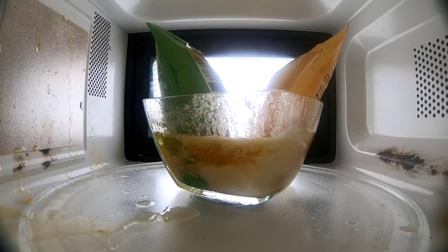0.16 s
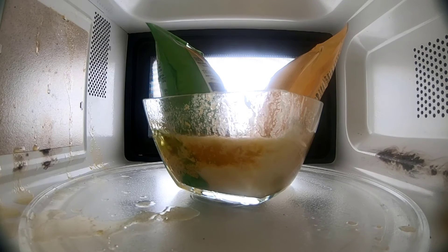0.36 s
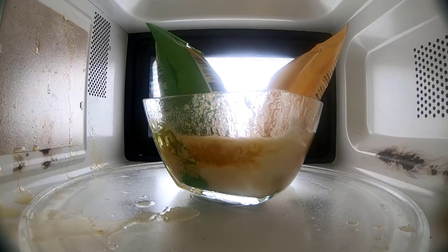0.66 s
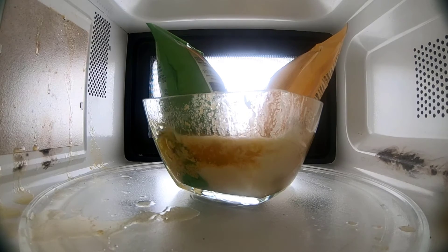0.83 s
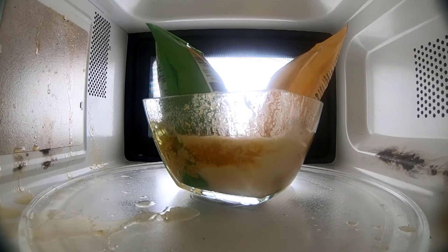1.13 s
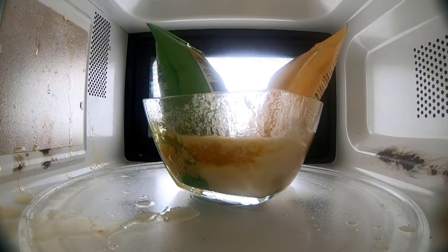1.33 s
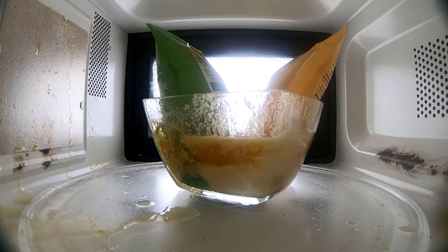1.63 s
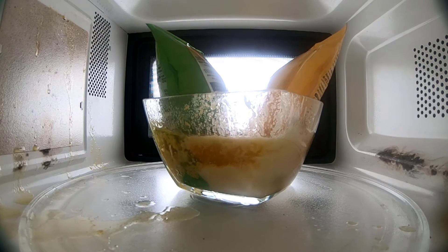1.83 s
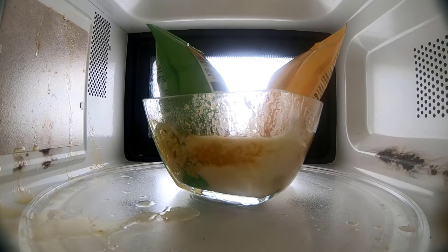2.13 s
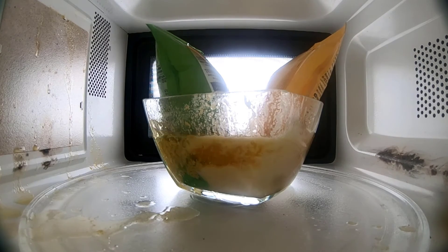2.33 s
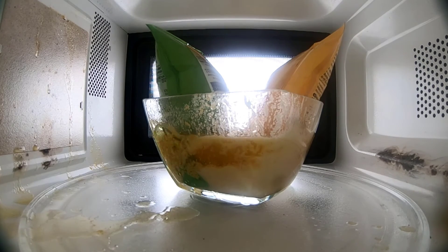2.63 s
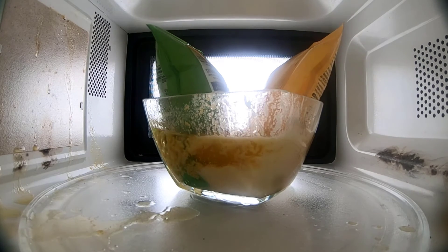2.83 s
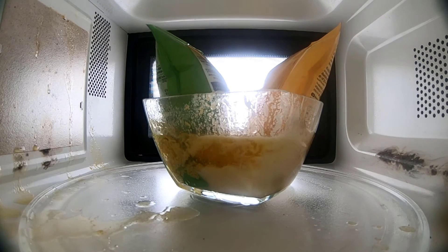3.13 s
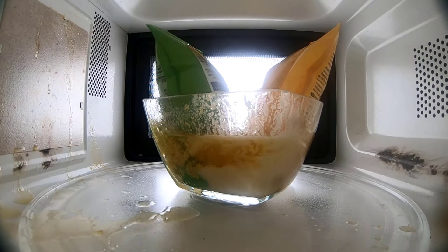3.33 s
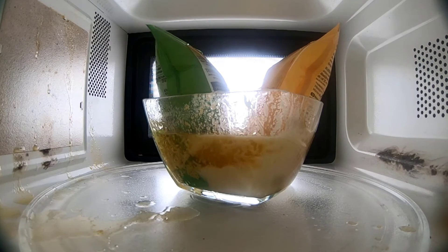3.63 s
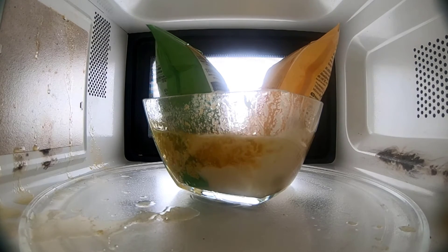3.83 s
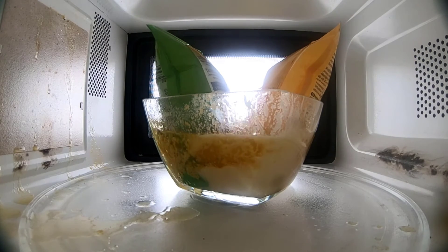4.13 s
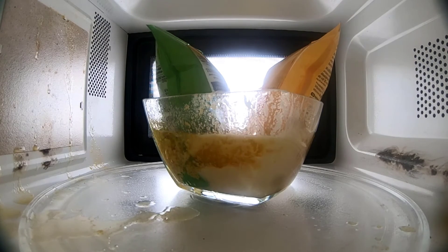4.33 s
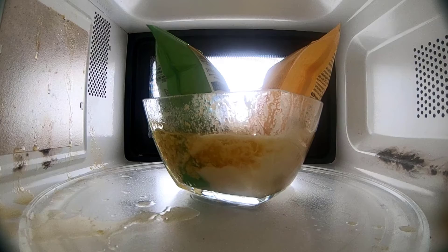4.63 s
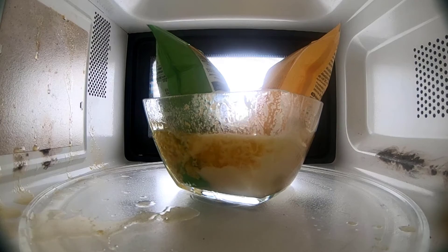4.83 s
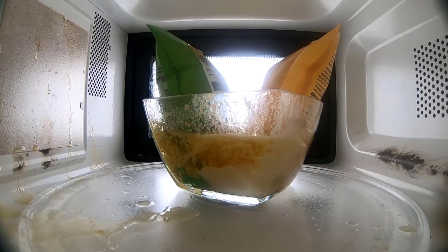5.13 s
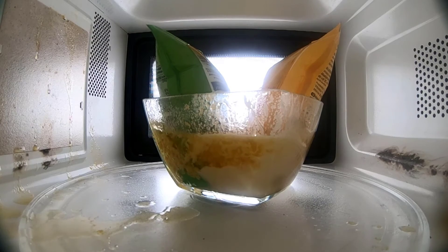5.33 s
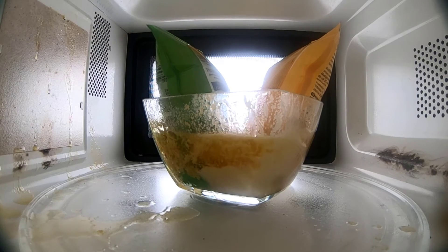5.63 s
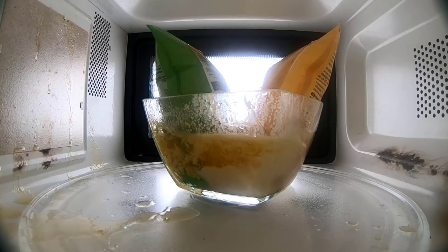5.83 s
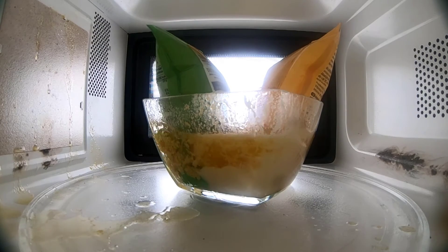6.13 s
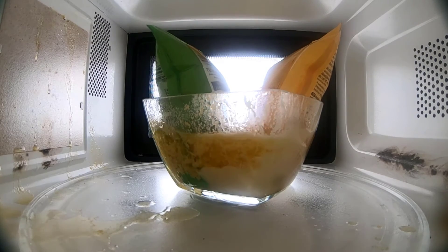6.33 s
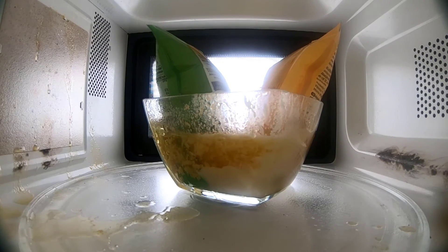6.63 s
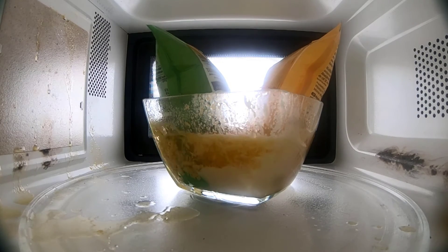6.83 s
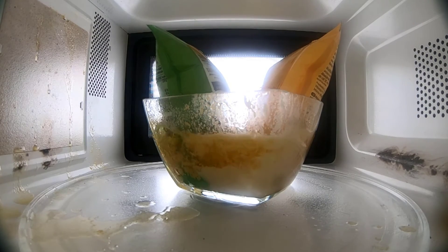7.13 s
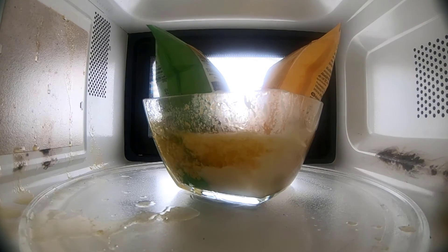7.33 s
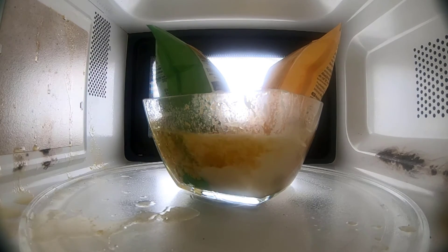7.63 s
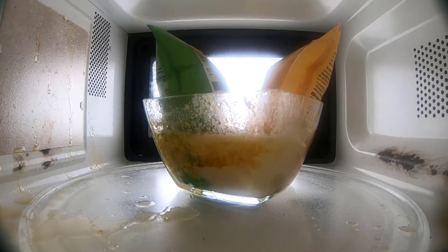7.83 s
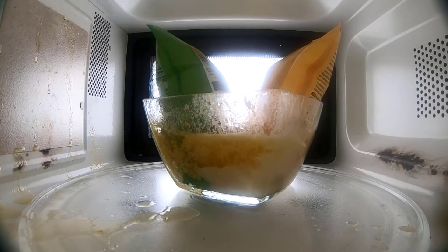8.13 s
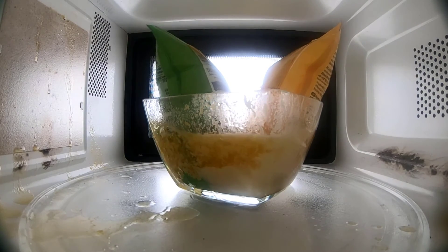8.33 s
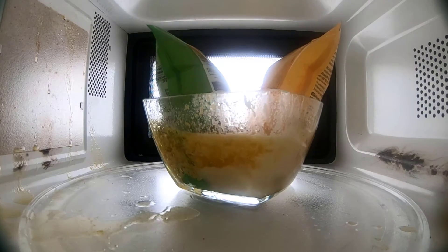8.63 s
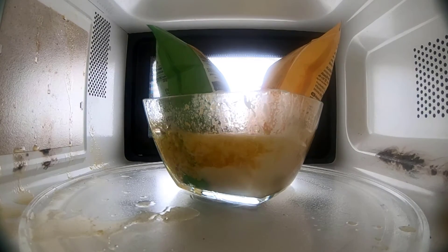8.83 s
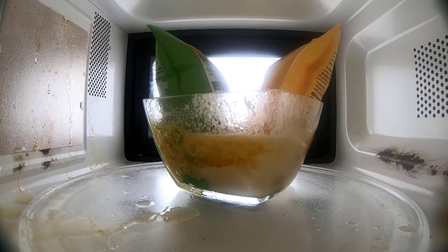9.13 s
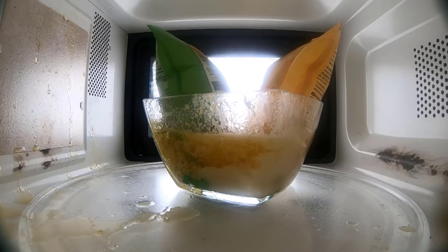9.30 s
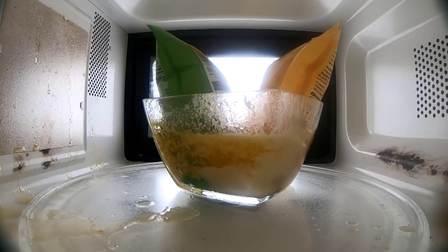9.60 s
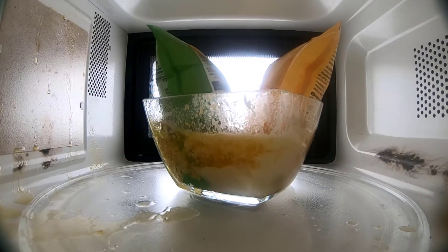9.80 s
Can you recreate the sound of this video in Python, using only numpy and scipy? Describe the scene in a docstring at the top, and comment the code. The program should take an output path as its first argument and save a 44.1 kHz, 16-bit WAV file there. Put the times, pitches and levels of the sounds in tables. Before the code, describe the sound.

Close inside a working microwave: low mains drone, rapid fan ticking on steel that pulses unevenly, airy rumble, barely audible food spits.

```python
"""Mains transformer hum inside a running microwave oven: sines at mains and fan shaft multiples and their mixes.
The fan turns a little slower than the mains field; once a turn its rotor ticks against the steel case,
harder or softer as the magnetic pull stands, ringing the case's decaying modes.
Shaped noise makes the air rumble, a low drone and the grille hiss; short noise puffs are food spits.
The two microphone ports hear the case nearly in opposite phase."""
import sys
import numpy as np
from scipy import signal
from scipy.fft import rfft, irfft, next_fast_len
from scipy.io import wavfile
from scipy.ndimage import uniform_filter1d, map_coordinates

SR = 44100
rng = np.random.default_rng(int(sys.argv[2]) if len(sys.argv) > 2 else 0)


def file_out(sig):
    """Save sig as 16-bit WAV at sys.argv[1]."""
    # one column per channel
    cols = np.atleast_2d(sig).T
    # limit, then scale
    lim = np.clip(cols, -1, 1)
    pcm = np.round(lim * 32767).astype(np.int16)
    wavfile.write(sys.argv[1], SR, pcm)


N = 439236

# fan shaft speed: time_s, speed_turns_per_s
SHAFT_SPEED = [(0.0, 43.189), (0.4, 43.072), (1.2, 43.33), (2.4, 43.252), (3.2, 43.691), (4.0, 43.633),
               (4.8, 43.397), (5.6, 43.618), (6.0, 43.604), (6.8, 43.434), (8.4, 43.503), (8.8, 43.383),
               (9.2, 43.515), (10.0, 43.44)]
# hum tones: mains_multiple, shaft_multiple, left_rms_db, right_rms_db, left_lead_rad
HUM_TONES = [(0, 1, -45, -47, -2.5), (1, 0, -60, -52, 2.4), (0, 2, -45, -38, 2.4), (2, 0, -32, -23, 3.0),
             (0, 3, -41, -43, -2.0), (3, 0, -52, -32, 2.6), (0, 4, -40, -48, -2.5), (2, 2, -52, -39, 2.9),
             (3, 1, -53, -41, -2.5), (4, 0, -37, -35, -1.4), (2, 3, -45, -34, 2.7), (3, 2, -50, -42, 2.5),
             (4, 1, -52, -41, 2.5), (-2, 8, -59, -48, 2.8), (5, 0, -47, -40, 2.6), (0, 6, -42, -28, 2.6),
             (3, 3, -57, -49, 3.0), (6, 0, -49, -69, 0.8), (0, 8, -57, -55, -1.2), (7, 0, -56, -46, 2.4),
             (8, 0, -56, -48, -2.2), (0, 10, -66, -62, 1.9), (9, 0, -64, -58, 2.3), (10, 0, -62, -57, 2.5),
             (12, 0, -71, -64, 2.8), (-2, 17, -68, -62, 2.9), (5, 9, -68, -62, 3.0),
             (-2, 18, -62, -62, 3.1), (14, 0, -62, -57, 2.5), (0, 18, -56, -54, 2.4),
             (16, 0, -65, -61, 2.8), (0, 19, -56, -56, 2.3), (1, 18, -61, -58, 2.6), (2, 17, -62, -59, 2.5),
             (0, 20, -60, -57, 2.6), (2, 18, -56, -56, 3.1), (24, 0, -61, -58, 2.7), (25, 0, -66, -63, 2.6),
             (26, 0, -63, -64, 2.4), (50, 0, -83, -87, -0.3), (54, 0, -88, -86, -1.1),
             (55, 0, -84, -84, 2.5), (59, 0, -85, -86, 1.9), (66, 0, -90, -94, 1.0), (68, 0, -89, -92, 0.8)]
# transformer hum shift near the end: mains_multiple, left_change_db, right_change_db, advance_rad
HUM_SHIFT = [(2, 4.5, 0.5, 0.64), (3, 4, 0.5, 0), (4, -0.5, 5.5, 0.59), (6, -0.5, 16, 0.23)]
# steel case modes: freq_hz, level_db (for a 0 dB blow), t60_s, first_swing_sign
CASE_MODES = [(622, -48.9, 0.15, -1), (742, -44.5, 0.15, -1), (822, -46, 0.083, -1), (883, -50, 0.15, -1),
              (957, -45.4, 0.06, -1), (1050, -45.7, 0.149, 1), (1108, -46.8, 0.15, 1),
              (1218, -42.9, 0.062, 1), (1318, -39.5, 0.064, -1), (1379, -41.7, 0.14, -1),
              (1390, -46.5, 0.148, 1), (1430, -32.9, 0.061, 1), (1532, -45.7, 0.15, -1),
              (1691, -62, 0.038, 1), (1817, -65, 0.077, -1), (1958, -51.2, 0.054, -1),
              (2030, -44.4, 0.033, -1), (2144, -40.1, 0.015, 1), (2218, -64.4, 0.15, 1),
              (2565, -68.4, 0.15, -1)]
# tick at left port against right: freq_hz, left_minus_right_db, left_lead_rad
PORT_RESPONSE = [(684, -4, 2.9), (756, 0.5, 2.17), (1260, 1.5, 2.8), (1335, -3.44, 1.965), (1846, 11, 2.34),
                 (1970, -0.5, 2.59), (2520, 4.5, 2.26), (2500, -2.5, 0.7)]
# cavity air: freq_hz, right_db_per_hz, left_minus_right_db, likeness_0_to_1, left_lead_rad
CAVITY_AIR = [(15, -76, -3.5, 0.5, 3), (55, -70, -3.5, 0.6, 3.5), (89.6, -55.5, -3, 0.7, 2),
              (135, -60.5, 3.5, 0.9, 5.2), (171, -57, -5.5, 0.3, 3), (206, -58.5, -3.5, 0.3, 3.9),
              (266.2, -50.5, -11.5, 0.5, 2.3), (284.7, -61.5, -8, 1, 2.5), (323, -66.5, -3, 0.2, 1.5),
              (376, -66.5, -7, 0.6, 4.3), (424, -65, -10, 0.1, 2.5), (484, -76.5, -7.5, 0, 0.66),
              (610, -79, -3.5, 0.7, 1.5), (770, -77.5, -4.5, 0, 2.5), (1350, -78.5, 1.5, 1, 2.4),
              (1680, -87.5, 4.5, 0.6, 2.7), (2190, -85, 3, .8, 2.6), (2440, -101, 0, 0, 7.7),
              (3330, -150, 1.5, 0.2, 1.8)]
# grille hiss: freq_hz, right_db_per_hz, left_minus_right_db, likeness_0_to_1
GRILLE_HISS = [(1800, -125, -2, 0), (2554, -94.5, 2, 0.3), (3190, -105, -0.5, 0), (3360, -104, -1, 0.3),
               (4510, -108, -6.5, 0.7), (4640, -115, -5.5, 0), (6600, -115, -3, 0), (7160, -111, -3, 0),
               (7700, -117, 1, .2), (8060, -122, 2.5, 0.1), (9260, -126, -1, 0), (10400, -138, 0, .2)]
# faint spits from the food: start_s, level_db (noise rms at the start, before filtering)
FOOD_SPITS = [(2.4598, -70), (5.8406, -62), (5.915, -65), (6.0417, -67), (6.2407, -68)]
# magnetic pulls, two a mains cycle: start_cycles, strength_db, growth_over_pull_db, early_lateness_ms
MAGNET_PULLS = [(-.02, 0.5, 0, 0.37), (0.399, -4, 5.5, .3)]

MAINS_HZ, START_TURNS = 49.9757, .4542
SHIFT_S = 8.97  # middle of the hum shift
BLADE_SPEED_TURNS_PER_S = 43.38  # the blade tone is louder while the fan runs slower than this
BLADE_SWING_DB, BLADE_WAVER_DB = 1.5, 1.3
GRIP_CYCLES, RELEASE_CYCLES = .11, .12  # time gripping and letting go, in mains cycles
SLACK_DB = -16.5  # blow strength between pulls
LATE_PULL_MS, SLACK_MS = -.55, -.55  # blow delay late in a pull and between pulls; negative is early
BRIGHTEN_DB = 3.5  # upper mode gain added over a pull
DRONE_DB, DRONE_SWELL_DB = -53, 2
FLUTTERS_PER_TURN = 4
TOP_HZ = 9880


def amp(db):
    """dB to gain."""
    return 10 ** (np.asarray(db) / 20)


def unit(x):
    """Scale to rms 1."""
    return x / np.sqrt(np.mean(x ** 2) + 1e-20)


def along(table, hz):
    """Interpolate each column after the frequency on a log axis."""
    freq_hz, *columns = np.transpose(table)
    return [np.interp(np.log(hz + 1), np.log(freq_hz + 1), column) for column in columns]


def wobble(knots_per_s):
    """Smooth random curve through evenly spaced normal knots."""
    knots = rng.standard_normal(int(N * knots_per_s / SR) + 4)
    return map_coordinates(knots, [np.arange(N) * knots_per_s / SR])


def filtered(x, response):
    """Multiply the spectrum of x by a complex response(hz)."""
    size = next_fast_len(N + SR // 2)
    return irfft(rfft(x, size) * response(np.fft.rfftfreq(size, 1 / SR)), size)[..., :N]


def pair(patchy_db, response):
    """Patchy stereo noise; response(hz) gives right dB per Hz, left-right dB, likeness and left lead."""
    noise = signal.stft(rng.standard_normal((2, N)), nperseg=1024)[2]
    patches = rng.standard_normal(noise.shape[1:])
    patches = uniform_filter1d(patches, size=3, axis=0)  # across frequency
    patches = uniform_filter1d(patches, size=6, axis=1)  # across time
    patchy = signal.istft(noise * amp(patchy_db * unit(patches)), nperseg=1024)[1]
    shared, own = patchy[:, :N] * np.sqrt(SR / 2)  # 0 dB per Hz
    right_db, balance_db, alike, lead_rad = response(np.fft.rfftfreq(N, 1 / SR))
    alike = np.clip(alike, 0, 1)
    right = rfft(shared) * amp(right_db)
    left_own = np.sqrt(1 - alike ** 2) * rfft(own) * amp(right_db)
    left = (alike * right * np.exp(1j * lead_rad) + left_own) * amp(balance_db)
    return irfft(np.array([left, right]), N)


def spits():
    """Steam puffs: decaying noise, bright at the right port, with a lower ring at the left."""
    out = np.zeros((2, N))
    t = np.arange(SR // 20) / SR
    for start_s, level_db in FOOD_SPITS:
        puff = amp(level_db - 60 * t / .07) * rng.standard_normal((2, len(t)))
        out[:, round(start_s * SR):][:, :len(t)] += puff

    def ports(hz):
        bright = amp(5) * hz ** 4 / (hz ** 4 + 4500. ** 4) / (1 + (hz / 8500.) ** 8)
        ring = amp(14) / (1 + ((hz - 2850) / 250) ** 2)
        return np.array([ring + amp(-6) * bright, bright])

    return filtered(out, ports)


def air(turns, at, strength_db):
    """Turbulent cavity noise, a narrow swelling drone, and grille hiss that each blow briefly shakes."""
    rumble = pair(patchy_db=1.5, response=lambda hz: along(CAVITY_AIR, hz))
    hiss = pair(patchy_db=2.0, response=lambda hz: [*along(GRILLE_HISS, hz), -.8])
    shake_decay = amp(-60 * np.arange(SR // 20) / SR / .081)  # t60 .081 s
    shake = signal.fftconvolve(np.bincount(at, amp(strength_db), N), shake_decay)[:N]
    flutter = np.cos(2 * np.pi * FLUTTERS_PER_TURN * turns)
    drone = pair(patchy_db=3, response=lambda hz: [-20 * np.log10(1 + ((hz - 370) / 13) ** 4), -8, .75, 2.9])
    drone_db = DRONE_DB + DRONE_SWELL_DB * wobble(3.7)
    return rumble + hiss * (1 + .3 * shake + .05 * flutter) + amp(drone_db) * unit(drone)


def shaft_turns():
    """Fan shaft angle in turns: the integral of its speed."""
    speed = np.interp(np.arange(N) / SR, *np.transpose(SHAFT_SPEED))
    return START_TURNS + np.cumsum(speed) / SR


def blows(turns):
    """One blow a turn, its strength and delay set by the pull; gives samples, strength dB, brightness dB."""
    turn_s = np.interp(np.arange(1, int(turns[-1])), turns, np.arange(N) / SR)
    start, level_db, growth_db, late_ms = np.transpose(MAGNET_PULLS)
    cycle = (turn_s * MAINS_HZ - start[0]) % 1 + start[0]
    k = (cycle >= start[1]).astype(int)  # which pull
    since = cycle - start[k]
    length = np.diff([*start, start[0] + 1])[k]
    grip = np.clip(np.minimum(since / GRIP_CYCLES, (length - since) / RELEASE_CYCLES), 0, 1)
    strength_db = SLACK_DB * (1 - grip) + level_db[k] + growth_db[k] * since / length
    gripping_ms = SLACK_MS + (late_ms[k] - SLACK_MS) * grip
    held = (since - GRIP_CYCLES) / (length - GRIP_CYCLES - RELEASE_CYCLES)
    held_ms = LATE_PULL_MS + (late_ms[k] - LATE_PULL_MS) * np.clip(1 - held, 0, 1)
    delay_ms = np.where(since < GRIP_CYCLES, gripping_ms, held_ms)
    chance = rng.standard_normal((len(turn_s), 3))
    blow_s = turn_s - .0045 + (delay_ms + .1 * chance[:, 0]) / 1e3  # just before each full turn
    strength_db = strength_db + 1.3 * chance[:, 1]
    bright_db = 1 + BRIGHTEN_DB * since / length + 2.5 * chance[:, 2]
    return np.round(blow_s * SR).astype(int), strength_db, bright_db


def ticks(at, strength_db, bright_db):
    """Blows ring the case modes as decaying sines; the drive to the upper modes varies blow to blow."""
    t = np.arange(SR // 4) / SR
    modes = np.array([np.sign(sign) * amp(level_db - 60 * t / t60_s) * np.sin(2 * np.pi * freq_hz * t)
                      for freq_hz, level_db, t60_s, sign in CASE_MODES])
    upper = np.transpose(CASE_MODES)[0] > 1600
    grind = amp(-43.5) * rng.standard_normal(N)  # the bearing keeps the lower modes ringing between blows
    lower_drive = np.bincount(at, amp(strength_db), N) + grind
    upper_drive = np.bincount(at, amp(strength_db + bright_db), N)
    ringing = signal.fftconvolve(lower_drive, modes[~upper].sum(axis=0))
    ringing = ringing + signal.fftconvolve(upper_drive, modes[upper].sum(axis=0))
    right = filtered(ringing[:N], lambda hz: 1 / (1 + (hz / 2480.0) ** 12))  # soft contact: no treble click

    def left_port(hz):
        balance_db, lead_rad = along(PORT_RESPONSE, hz)
        return amp(balance_db) * np.exp(1j * lead_rad)

    return np.array([filtered(right, left_port), right])


def hum(turns):
    """Transformer, fan and mixing tones: sines at sums of mains and shaft multiples, wavering in level."""
    t = np.arange(N) / SR
    later = np.clip((t - SHIFT_S) / .05 + .5, 0, 1)
    shifts = {round(multiple): change for multiple, *change in HUM_SHIFT}
    speed = np.interp(t, *np.transpose(SHAFT_SPEED))
    blade_db = BLADE_SWING_DB * np.tanh((BLADE_SPEED_TURNS_PER_S - speed) / .08) + BLADE_WAVER_DB * wobble(3)
    out = np.zeros((2, N))
    for mains, shaft, left_db, right_db, lead_rad in HUM_TONES:
        mains, shaft = round(mains), round(shaft)
        change = shifts.get(mains, np.zeros(3)) if shaft == 0 else np.zeros(3)
        left_up_db, right_up_db, advance_rad = change
        cycles = mains * MAINS_HZ * t + shaft * turns + rng.random()
        angle = 2 * np.pi * cycles + advance_rad * later
        waver_db = (.3 if shaft == 0 else 1.2) * wobble(2.8)  # tones tied to the fan wander more
        if (mains, shaft) == (0, 6):  # blade tone
            waver_db = blade_db
        out[0] += amp(left_db + left_up_db * later + waver_db) * np.sin(angle + lead_rad)
        out[1] += amp(right_db + right_up_db * later + waver_db) * np.sin(angle)
    return np.sqrt(2) * out  # rms to peak


def scene():
    """Sum of all sources at the two ports."""
    turns = shaft_turns()
    at, strength_db, bright_db = blows(turns)
    background = spits() + air(turns, at, strength_db + bright_db)
    return background + ticks(at, strength_db, bright_db) + hum(turns)


def record(dry):
    """Fade in and out over 4 ms; cut everything above the band limit."""
    rise = np.sin(np.pi / 2 * np.clip(np.arange(N) / SR / .004, 0, 1)) ** 2
    return filtered(dry * rise * rise[::-1], lambda hz: hz < TOP_HZ)


dry = scene()
out = record(dry)
file_out(out)
```